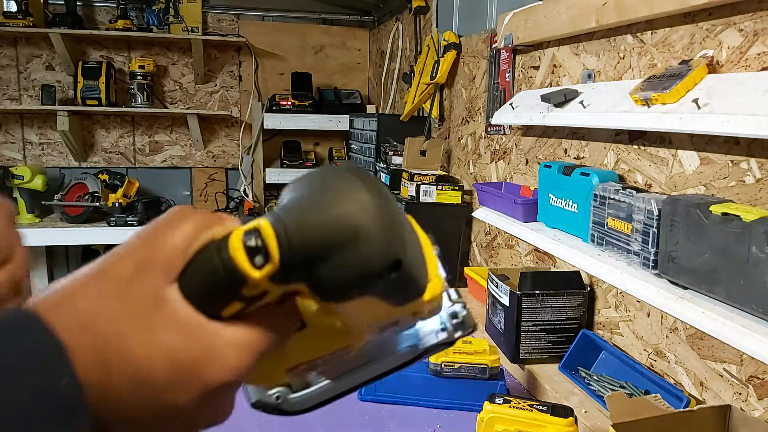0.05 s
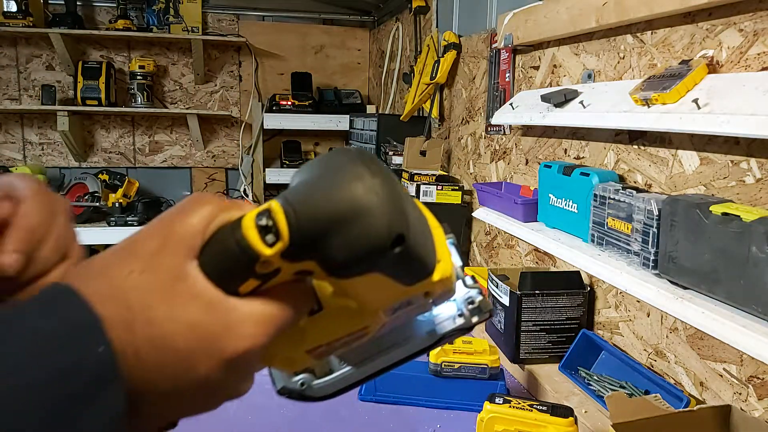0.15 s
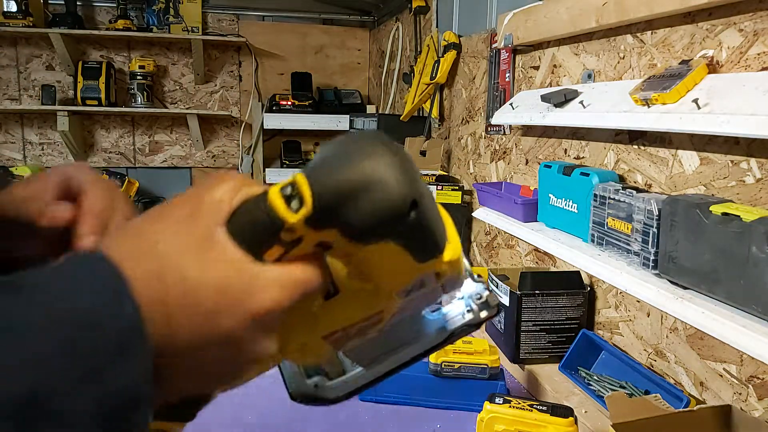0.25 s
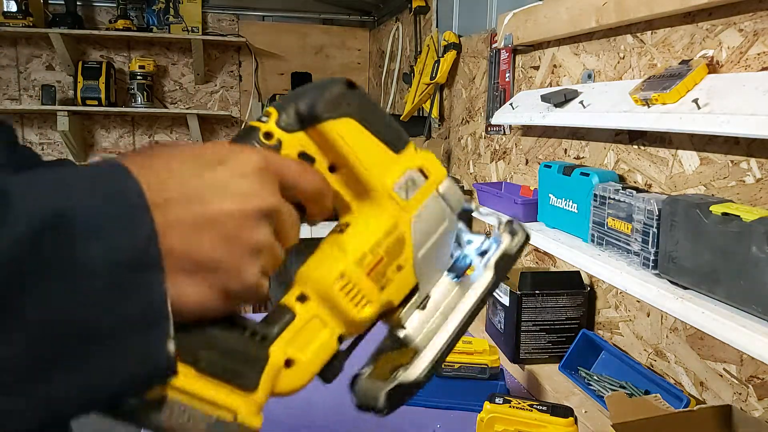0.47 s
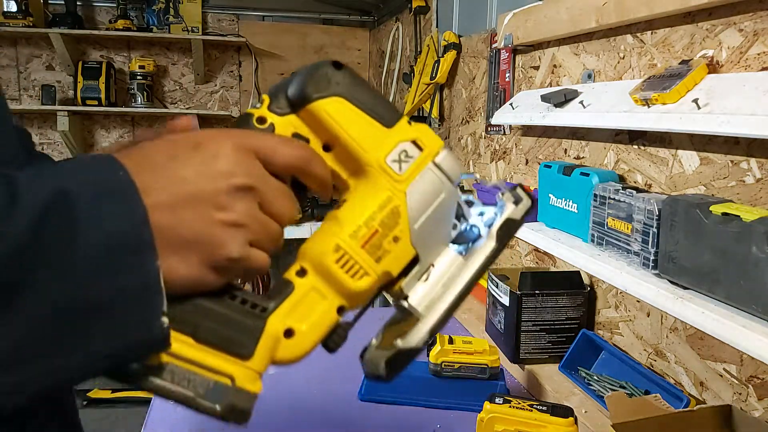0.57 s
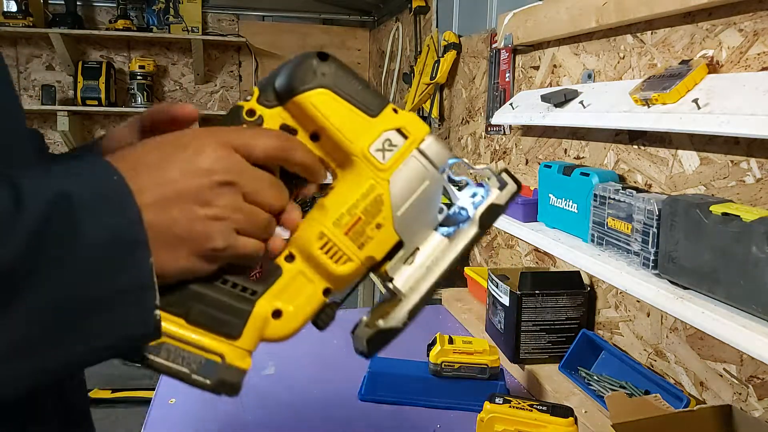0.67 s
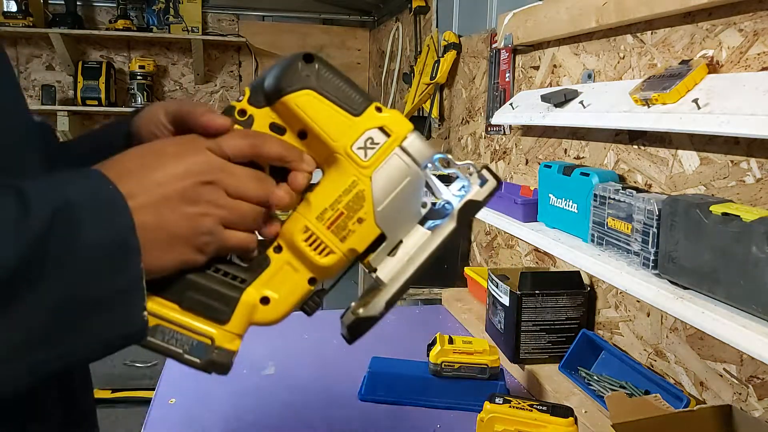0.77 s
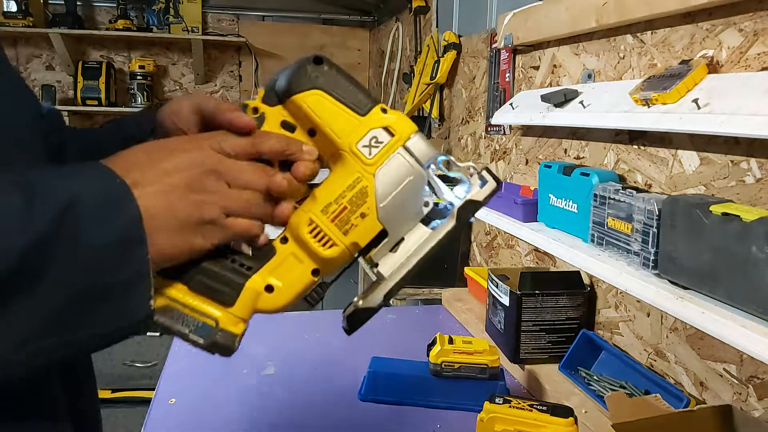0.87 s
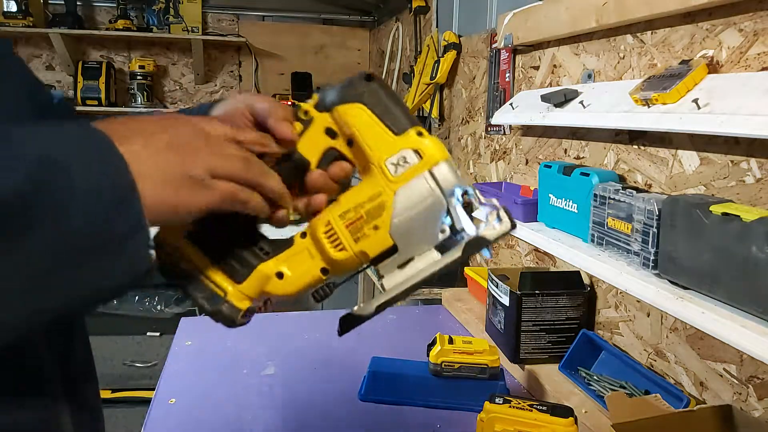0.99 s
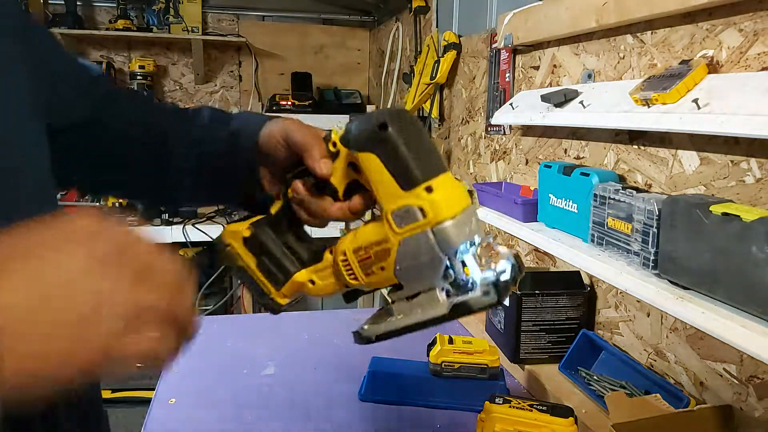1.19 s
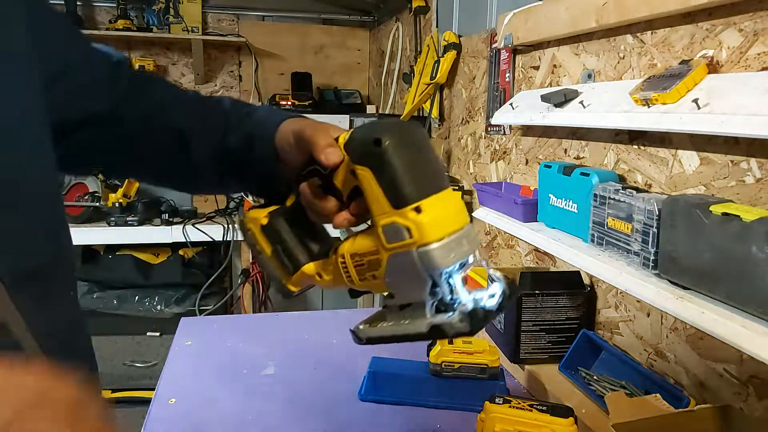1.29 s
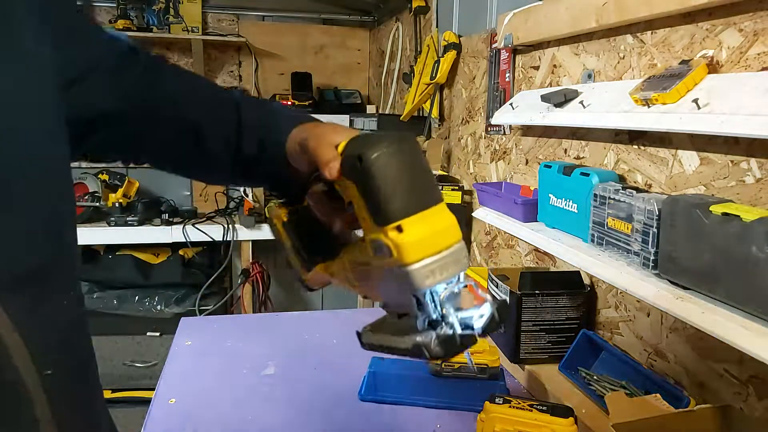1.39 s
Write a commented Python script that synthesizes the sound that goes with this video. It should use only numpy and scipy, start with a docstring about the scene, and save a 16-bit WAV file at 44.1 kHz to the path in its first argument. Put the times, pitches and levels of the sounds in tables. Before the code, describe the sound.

A cordless jigsaw dies away, clicks, whines up briefly, coasts down and starts again.

```python
"""In a small wood-lined workshop, a cordless jigsaw is blipped with its blade in the air.
One run dies away, the trigger clicks, the motor spins up and coasts down, and at the end it starts again.
The blade shaft knocks by impact at each reversal; tooth contacts excite the resonances of the casing,
and the gears whine at multiples of the stroke rate. Between runs, friction makes a sleeve rustle
over the low rumble of the room."""
import sys
import numpy as np
from scipy import signal
from scipy.fft import rfft, irfft
from scipy.io import wavfile

SR = 44100
rng = np.random.default_rng(int(sys.argv[2]) if len(sys.argv) > 2 else 0)


def wav_record(signal):
    """Record a signal, one row per channel, as 16-bit PCM in the file named by sys.argv[1]."""
    frames = np.transpose(np.atleast_2d(signal))
    bounded = np.clip(frames, -1, 1)
    # unit amplitude maps onto the largest positive 16-bit level
    quanta = np.round(bounded * 32767).astype(np.int16)
    wavfile.write(sys.argv[1], SR, quanta)


N = 63945
T = np.arange(N) / SR
SIZE = 2 ** 17
HZ = np.maximum(np.arange(SIZE // 2 + 1) * SR / SIZE, 1)
FULL_SPEED, REVERSAL_PHASE = 50.35, .3   # strokes per s; half-strokes
CUTOFF_HZ = 16100


def from_db(db):
    """Amplitude ratio for a level in decibels."""
    return 10 ** (np.asarray(db) / 20)


def rms_one(x):
    """Normalisation to unit rms."""
    return x / np.sqrt(np.mean(x ** 2) + 1e-20)


def in_time(rows):
    """Linear interpolation of a table in time."""
    return np.interp(T, *np.transpose(rows))


def at_hz(points, hz=HZ):
    """Interpolation of a table in log frequency."""
    f, v = np.transpose(points)
    return np.interp(np.log(hz), np.log(f), v)


def pan(db):
    """Level difference, left minus right, as two gains."""
    return from_db(np.array([[1], [-1]]) * db / 2)


def shape(x, gain):
    """Minimum-phase filtering: folding the cepstrum makes the response causal."""
    cepstrum = irfft(np.log(gain + 1e-9))
    cepstrum[1:SIZE // 2] *= 2
    cepstrum[SIZE // 2 + 1:] = 0
    return irfft(rfft(x, SIZE) * np.exp(rfft(cepstrum)))[..., :N]


def drift(hz):
    """Random modulation: low-passed noise of unit rms."""
    return rms_one(irfft(rfft(rng.standard_normal(SIZE)) / (1 + (HZ / hz) ** 2))[:N])


def passes(turns):
    """Samples at which a phase completes a cycle."""
    return np.flatnonzero(np.diff(np.floor(turns)) > 0)


# Coherence of left and right: f/Hz, correlation
COHERENCE = [(50, 1), (120, 0.93), (300, 0.72), (800, 0.05), (2000, 0.14), (8000, 0.07)]
def stereo_noise(db=0):
    """Diffuse field: coloured noise of unit rms, alike on both sides only at long wavelengths."""
    alike = at_hz(COHERENCE)
    mid, side = rfft(rng.standard_normal((2, SIZE)))
    spectrum = np.sqrt(1 + alike) * mid + np.sqrt(1 - alike) * side * [[1], [-1]]
    return rms_one(irfft(from_db(db) * spectrum)[:, :N])


# Stroke rate of the blade: t/s, f/Hz
STROKE_RATE = [(0, 7), (.06, 0), (.146, 0), (.165, 14), (.2, 27.5), (.24, 37.5), (.285, 47), (.315, 49.5),
               (.35, 51.5), (.385, 51.5), (.435, 49.5), (.475, 43), (.52, 33), (.6, 19.5), (.65, 16),
               (.75, -0.5), (1.423, 0.5), (1.45, 20)]
# Strength of the drive's vibration: t/s, level/dB
DRIVE_LEVEL = [(0, -35), (.02, -38.5), (.05, -49), (.1, -54.5), (.144, -54), (.147, -33), (.172, -32),
               (.182, -27), (.225, -23.5), (.24, -21), (.295, -18.5), (.44, -17.5), (.495, -23),
               (.535, -35), (.6, -49.5), (.66, -69), (.72, -85.5), (1.422, -84), (1.4245, -32),
               (1.45, -30.5)]
def motor_motion():
    """Phase is the integral of frequency: returns stroke rate, strokes made and drive amplitude."""
    speed = np.maximum(in_time(STROKE_RATE), 0)
    return speed, np.cumsum(speed) / SR, from_db(in_time(DRIVE_LEVEL))


# Casing resonances over the broad response: f/Hz, bandwidth/Hz, level/dB
CASING_MODES = [(840, 38, 7.5), (944, 40, 3), (1153, 55, 8.5), (1440, 30, -14.5), (1569, 65, 10.5),
                (1970, 130, 6.5), (1973, 40, 8), (2240, 130, 4.5), (2344, 70, 1), (3000, 140, 5.5),
                (3870, 240, -1.5), (4160, 100, 2), (5880, 70, 3), (7170, 260, -3.5), (9100, 91, 1),
                (12500, 420, -3)]
# Broad response of the casing: f/Hz, level/dB
CASING_RESPONSE = [(100, -54.5), (240, -24), (350, -12), (520, -11), (750, -10.5), (1050, -7), (1400, -8),
                   (2300, -.5), (3900, 0), (5200, -1.5), (7500, -4), (11000, -8.5), (13500, -8),
                   (16000, -16)]
def casing():
    """Resonance: the casing's gain is a set of Lorentzian peaks on a broad response."""
    peaks = sum(from_db(db) ** 2 / (1 + (2 * (HZ - hz) / width) ** 2) for hz, width, db in CASING_MODES)
    return rms_one(from_db(at_hz(CASING_RESPONSE)) * np.sqrt(1 + peaks))


def gears(speed, strokes, drive, contacts=256, periodic_share=0.33, chatter_per_s=9000):
    """Impact excitation: tooth contacts recurring every stroke and random chatter drive the casing."""
    chatter = rng.choice([-1, 1], N) * from_db(3.5 * np.minimum(rng.exponential(1, N), 4))
    chatter *= rng.random(N) < chatter_per_s / SR
    faults = rms_one(rng.standard_normal(1024)[:contacts])
    at, teeth = passes(strokes * contacts), np.zeros(N)
    tooth = (strokes[at + 1] * contacts).astype(int) % contacts
    teeth[at] = faults[tooth] * np.sqrt(SR / contacts / np.maximum(speed[at], 10))
    force = (np.sqrt(periodic_share) * teeth + np.sqrt(1 - periodic_share) * rms_one(chatter)) * drive
    force *= from_db(0.5 + 2.5 * np.cos(2 * np.pi * (2 * strokes + REVERSAL_PHASE)))   # reversals swell
    soft = signal.sosfilt(signal.butter(1, 3380, fs=SR, output="sos"), force)
    treble = (force - soft) * from_db(0.04 * (speed - FULL_SPEED))   # slow gears sound duller
    return shape(soft + treble, casing())


# Modes of the motor and gearbox: f/Hz, bandwidth/Hz, level/dB
GEARBOX_MODES = [(959, 53, -6), (1456, 37, -3.5), (1600, 70, -7.5), (1878.6, 43, 1), (2260, 76, -12.5),
                 (2385, 80, -5.5), (3465, 40, -9.5), (3696, 120, -2.5), (4070, 100, -6)]
def motor_strain(speed, strokes, drive, pulses_per_stroke=40, uneven=0.68, brake_share=0.91):
    """Forced vibration: while the speed changes, uneven torque pulses set the gearbox ringing."""
    acceleration = np.gradient(speed) * SR / 356   # full torque at 356 strokes per s per s
    torque = np.clip(np.maximum(acceleration, -brake_share * acceleration), 0, 1)
    at, force = passes(strokes * pulses_per_stroke + .15 * drift(200)), np.zeros(N)
    strength = 1 + uneven * rng.standard_normal(N)[at]
    force[at] = strength * np.sqrt(SR / pulses_per_stroke / np.maximum(speed[at], 3))
    force = (force + rng.standard_normal(N)) / np.sqrt(2 + uneven ** 2)
    modes = sum(from_db(db) ** 2 / (1 + ((HZ / hz - hz / HZ) * hz / width) ** 2)
                for hz, width, db in GEARBOX_MODES)
    return shape(force * torque * drive * from_db(2), rms_one(np.sqrt(modes)))


# Balance of the rattle: f/Hz, left-right level/dB
RATTLE_BALANCE = [(300, 4), (700, 4), (1300, -1), (2500, -2.5), (4500, 4.5), (8500, -1), (13000, 0)]
def casing_rattle(motion, faces=3):
    """Incoherent addition: each face of the casing radiates into the room by its own paths."""
    rattle = sum(workshop(gears(*motion) + motor_strain(*motion)) for _ in range(faces)) / np.sqrt(faces)
    return irfft(rfft(rattle, SIZE) * pan(at_hz(RATTLE_BALANCE)))[:, :N]


# Gear and motor tones: order/cycles per stroke, level/dB re the drive at full speed,
# left-right level/dB, rms phase wander/rad, exponent of growth with speed
WHINE_ORDERS = [(7.003, -26, -3.5, 0.24, 2.4), (13, -15, -6, 0.12, 12.6), (14.97, -18.5, 5, .2, 7.7),
                (16, -16, -5.5, .2, 3.8), (30.03, -16, -3.5, 0.23, 3.6), (38.6, -16, -4, 0.77, 2.5),
                (65.6, -10, -6, 1.06, 0.67), (121.14, -9, -10.5, 0.96, 0.98),
                (190.5, -11.5, -13.5, 2.07, 2.6), (240.7, -16, -10.5, 3.0, 2.5)]
def whine(speed, strokes, drive, wander_hz=92, radiation_hz=576):
    """Rotational orders: gear mesh, fan and motor tones follow the speed, roughened by phase noise."""
    tones = 0
    for order, db, side_db, wander, power in WHINE_ORDERS:
        tone = np.sqrt(2) * np.sin(2 * np.pi * order * strokes + wander * drift(wander_hz))
        tones = tones + pan(side_db) * tone * drive * from_db(db) * (speed / FULL_SPEED) ** power
    # The small casing radiates little bass.
    return signal.sosfilt(signal.butter(2, radiation_hz, "high", fs=SR, output="sos"), tones)


# Spectrum of the room's background: f/Hz, level/dB
RUMBLE_SPECTRUM = [(20, -33), (38, -20), (55, -4), (85, -.5), (115, -4.5), (145, -15.5), (210, -21),
                   (400, -20), (800, -25.5), (1600, -35), (4000, -41), (9000, -48), (16000, -62.5)]
def room_rumble():
    """Stationary noise: a steady background with most of its power in the bass."""
    return from_db(-46) * stereo_noise(at_hz(RUMBLE_SPECTRUM))


# Trigger clicks and jolts of the gears taking up: t/s, level/dB, left-right level/dB, centre f/Hz
CLICK_EVENTS = [(.1005, -10.5, -2, 6500), (0.147, -7.5, -3, 1700), (.753, -24, 2, 2000),
                (1.066, -22, 2, 1700), (1.4234, -1, 0.5, 2000)]
def clicks(decay_s=0.0028, edge_ratio=2.17):
    """Transient excitation: short crunches of plastic and gear play ring in the casing."""
    force = 0
    for start, db, side_db, hz in CLICK_EVENTS:
        burst = rng.standard_normal(N) * (T >= start) * np.exp(-np.abs(T - start) / decay_s) + 1e-18
        band = signal.butter(1, [hz / edge_ratio, hz * edge_ratio], "band", fs=SR, output="sos")
        force = force + pan(side_db) * from_db(db - 20.5) * signal.sosfilt(band, burst)
    return shape(force, casing())


# Response to the blade shaft's knock: f/Hz, level/dB
KNOCK_RESPONSE = [(100, -38.5), (250, -29.5), (360, -16.5), (540, -13.5), (665, 1), (735, 0.5), (815, 7),
                  (950, -14), (1600, -6.5), (3000, -6.5), (6000, -13.5), (15000, -30)]
def blade_shaft(speed, strokes, drive, return_db=-2, spread_db=0.96):
    """Reciprocating impact: the shaft knocks at both ends of its stroke, more weakly on the return."""
    at, force = passes(2 * strokes + REVERSAL_PHASE), np.zeros(N)
    db = -7 + return_db * (np.arange(len(at)) % 2) + spread_db * rng.standard_normal(N)[:len(at)]
    db += 0.2 * (speed[at] - FULL_SPEED)   # a slow shaft knocks softly
    force[at] = from_db(db) * drive[at] * np.sqrt(SR / 2 / FULL_SPEED)
    return shape(force, rms_one(from_db(at_hz(KNOCK_RESPONSE))))


# Envelope of the sleeve and hand rubbing: t/s, level/dB
RUB_LEVEL = [(.6, -66), (.76, -56), (.84, -68), (.92, -67.5), (.97, -59), (1.1, -59), (1.2, -54),
             (1.32, -50.5), (1.42, -55.5), (1.45, -60)]
# Spectrum of the rubbing: f/Hz, level/dB
RUB_SPECTRUM = [(200, -29), (500, -4.5), (1200, 2.5), (2500, 3), (4200, 0.5), (6000, -1.5), (7500, 0),
                (9000, -7.5), (12500, -4.5), (16000, -18)]
def handling(slide_s=0.99, slide_width_s=0.044, grain_db=1.5, grain_hz=120):
    """Friction noise: the sleeve rustles and fingers slide once over the plastic grip."""
    sleeve = stereo_noise(at_hz(RUB_SPECTRUM)) * from_db(in_time(RUB_LEVEL))
    slide = signal.sosfilt(signal.butter(2, 6000, "high", fs=SR, output="sos"), stereo_noise())
    slide *= from_db(-53) * np.exp(-.5 * ((T - slide_s) / slide_width_s) ** 2)
    return (sleeve + slide) * from_db(grain_db * drift(grain_hz))


# Reverberation time of the workshop: f/Hz, T60/s
REVERB_TIME = [(750, 0.26), (3200, 0.34), (7500, 0.27), (13000, 0.19)]
def workshop(x, nearer_db=0, tail_onset_s=.004, scatter_decay_s=0.0057, right_lag_s=.00009):
    """Reverberation: direct sound, scatter from bench and near wall, and a tail decaying by band."""
    noise, tail = rfft(stereo_noise(), SIZE), 0
    edges_hz = [0, 1500, 5000, 10000, SR]
    for low, high in zip(edges_hz, edges_hz[1:]):
        t60 = at_hz(REVERB_TIME, (low + high) / 2)
        tail = tail + irfft(noise * (HZ >= low) * (HZ < high))[:, :N] * from_db(-60 * T / t60)
    early = stereo_noise() * np.exp(-T / scatter_decay_s)
    wet, scatter = from_db(-3.5 - nearer_db), from_db(2.5 - nearer_db)
    echoes = (wet * rms_one(tail * (T > tail_onset_s)) + scatter * rms_one(early)) / np.sqrt(N)
    direct = np.exp(-2j * np.pi * HZ * right_lag_s * np.array([[0], [1]]))
    response = (direct + rfft(echoes, SIZE)) / np.sqrt(1 + wet ** 2 + scatter ** 2)
    return irfft(rfft(x, SIZE) * response)[:, :N]


def scene():
    """Superposition: the saw in its room, the handling and the background add."""
    motion = motor_motion()
    rattle = casing_rattle(motion)
    near = workshop(blade_shaft(*motion) + whine(*motion) + clicks(), nearer_db=6)
    return rattle + near + handling() + room_rumble()


def record(dry):
    """Band limiting: a steep low-pass filter removes the highest treble."""
    return signal.sosfilt(signal.ellip(12, .1, 90, CUTOFF_HZ, fs=SR, output="sos"), dry)


dry = scene()
out = record(dry)
wav_record(out)
```